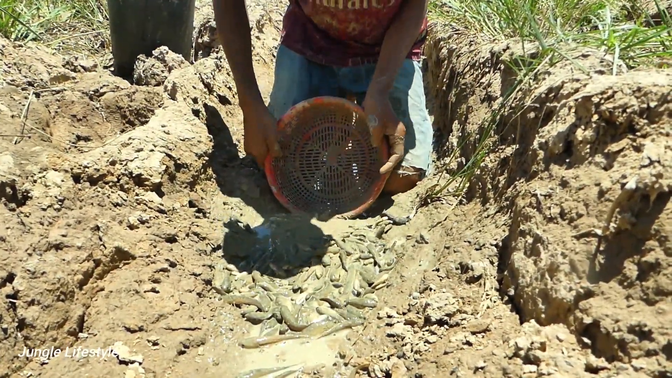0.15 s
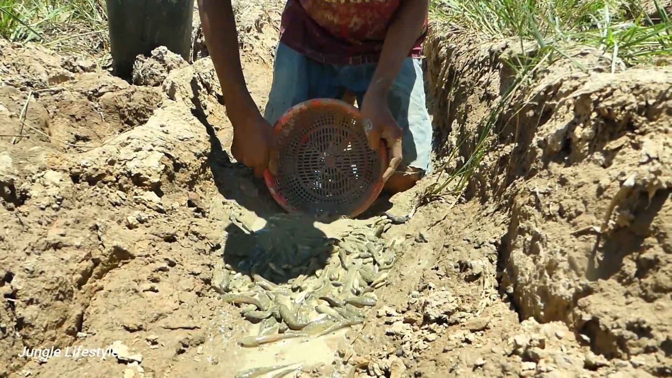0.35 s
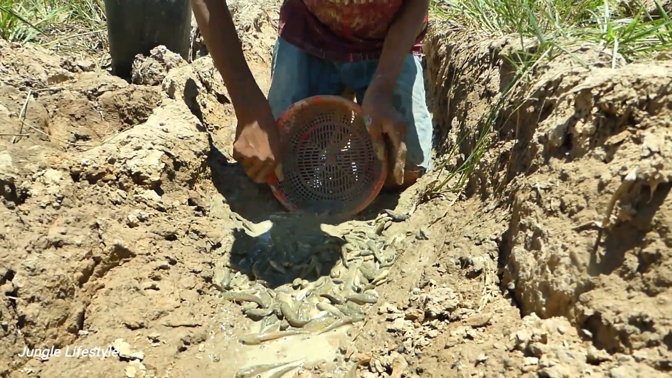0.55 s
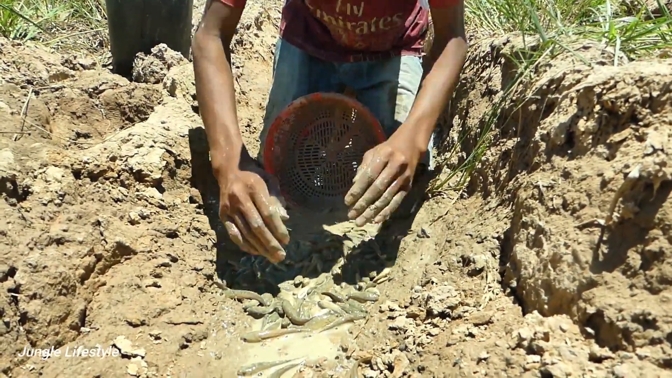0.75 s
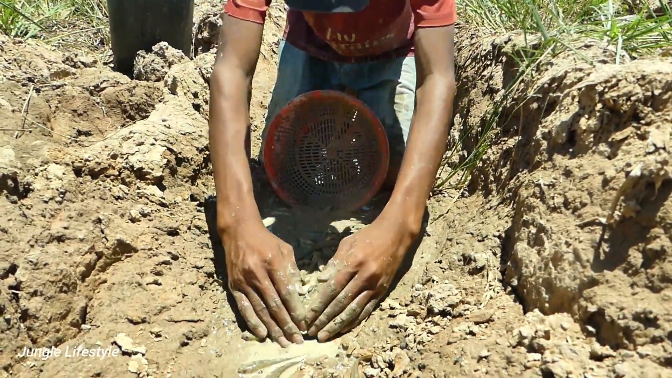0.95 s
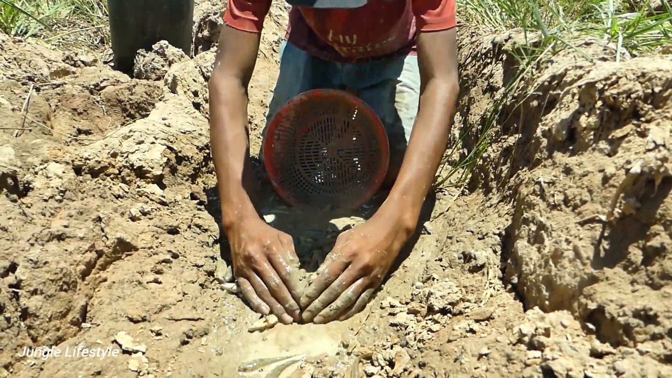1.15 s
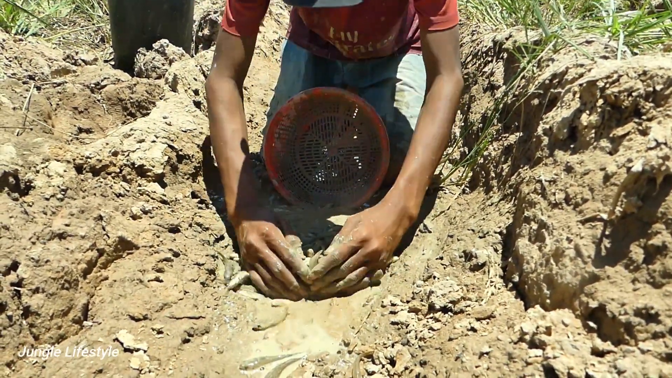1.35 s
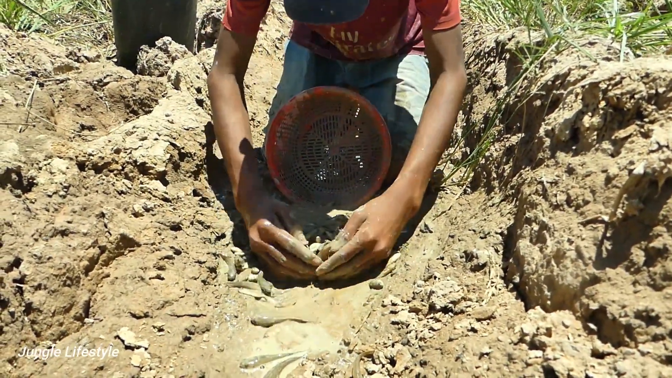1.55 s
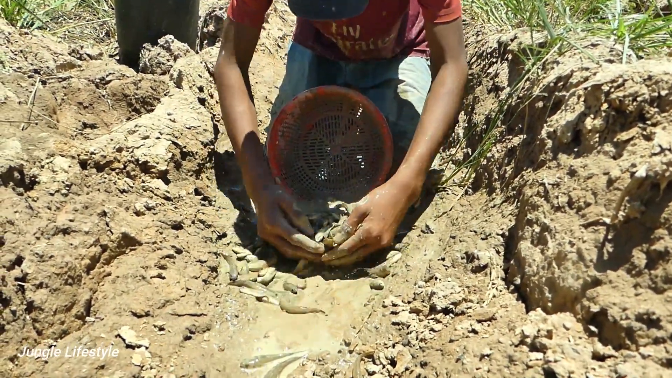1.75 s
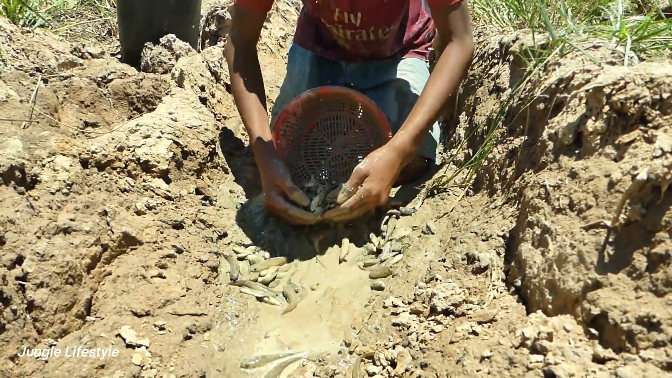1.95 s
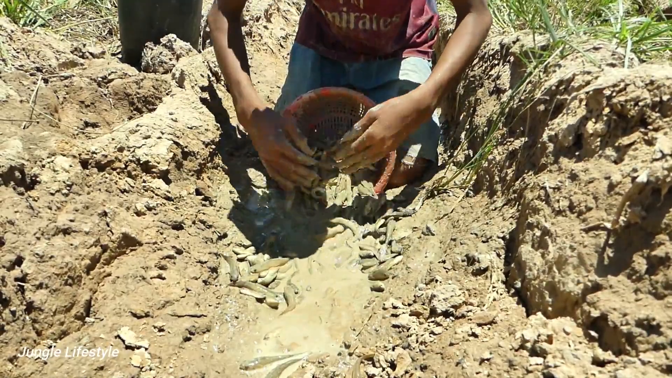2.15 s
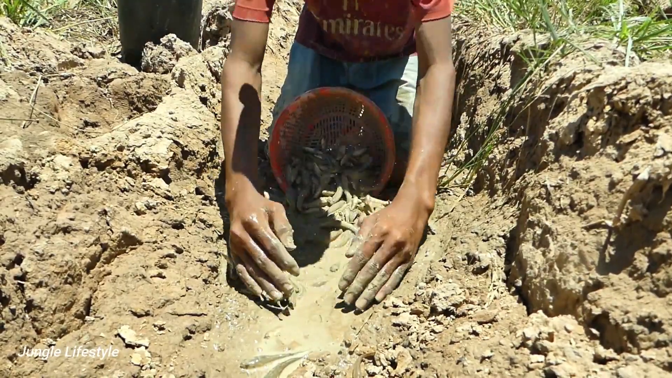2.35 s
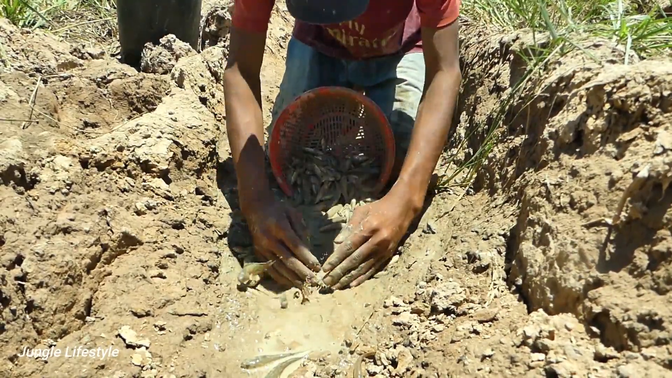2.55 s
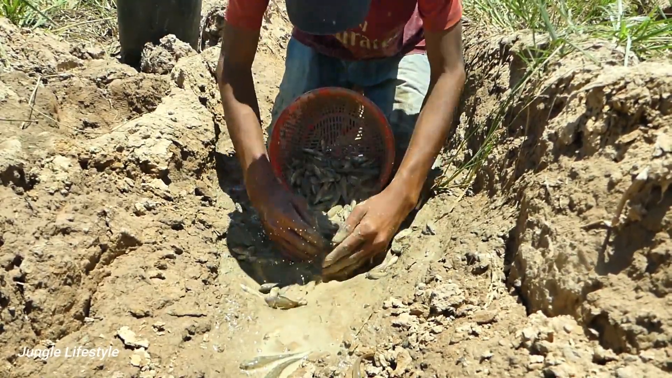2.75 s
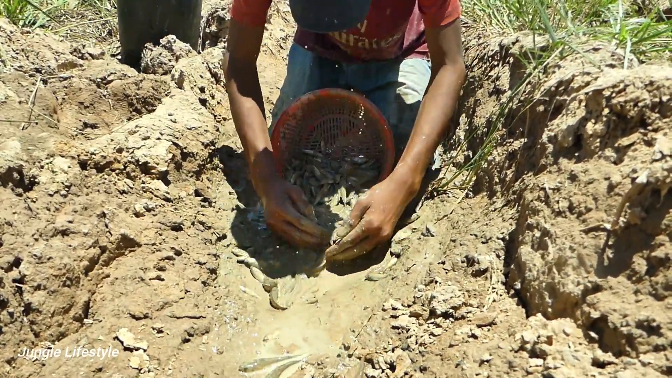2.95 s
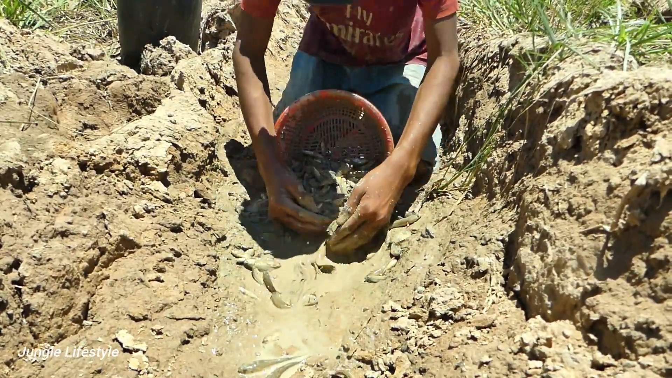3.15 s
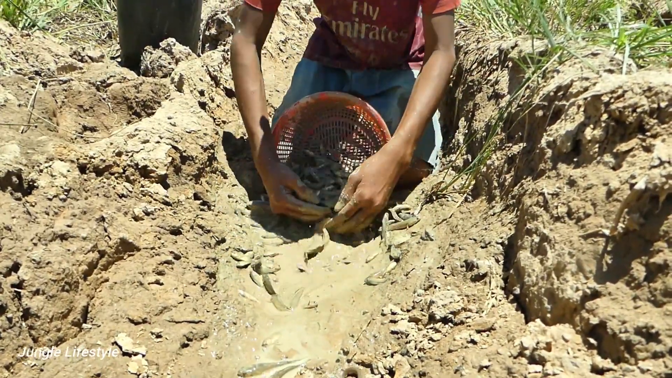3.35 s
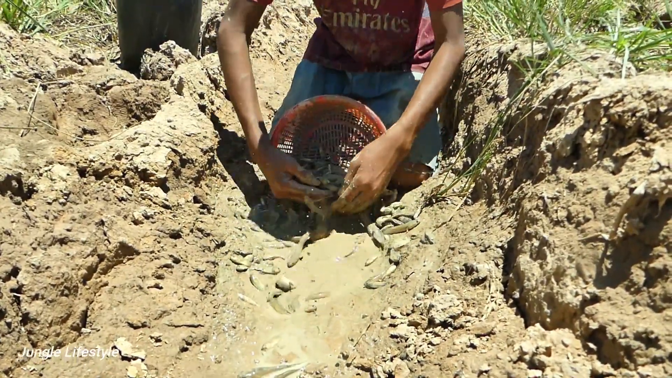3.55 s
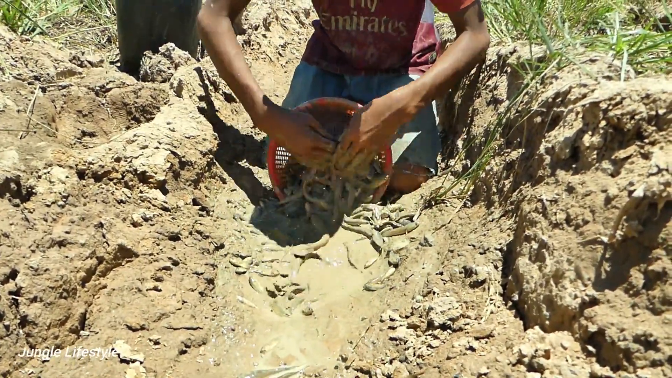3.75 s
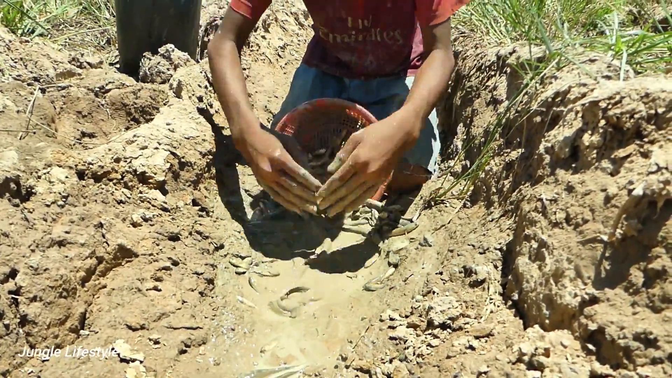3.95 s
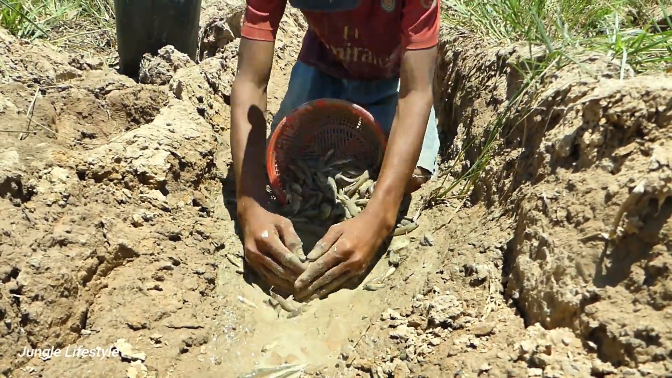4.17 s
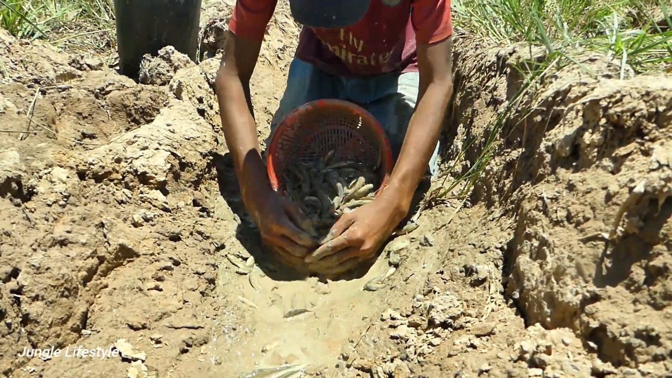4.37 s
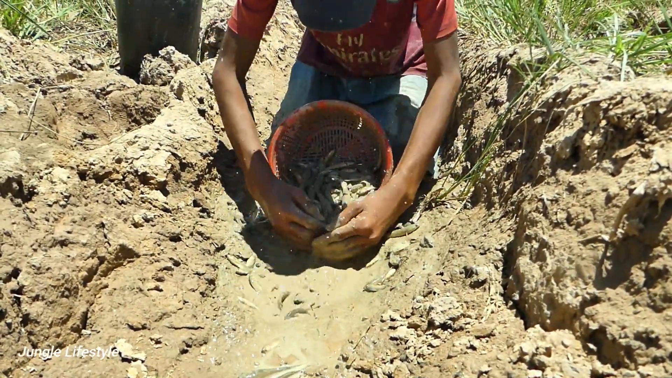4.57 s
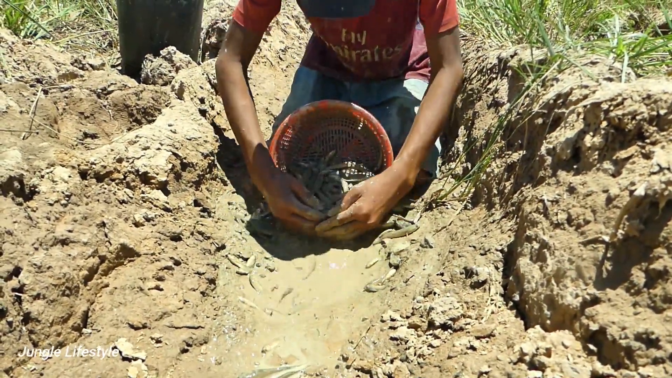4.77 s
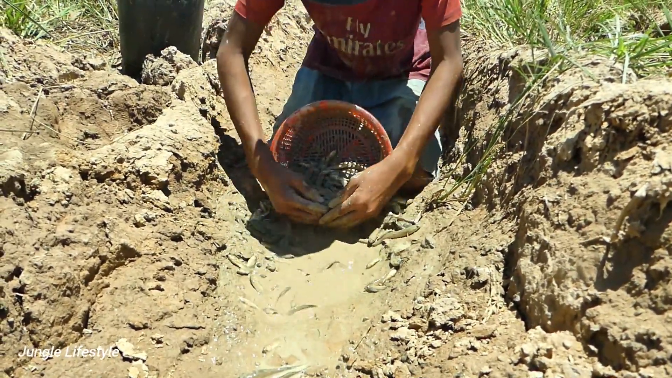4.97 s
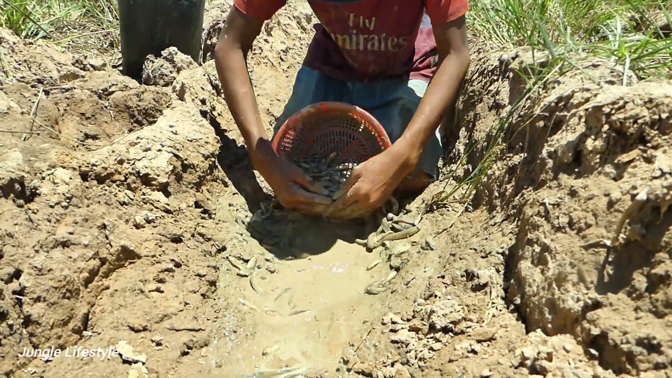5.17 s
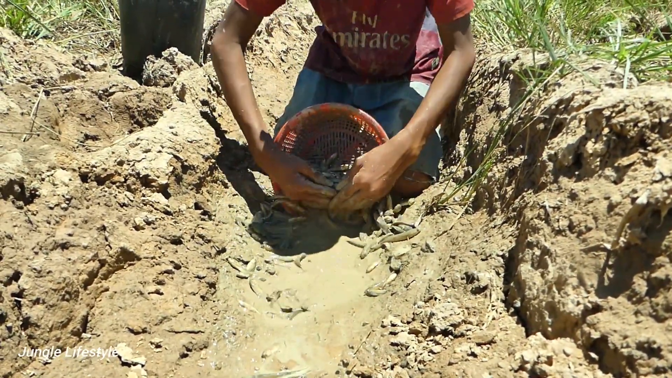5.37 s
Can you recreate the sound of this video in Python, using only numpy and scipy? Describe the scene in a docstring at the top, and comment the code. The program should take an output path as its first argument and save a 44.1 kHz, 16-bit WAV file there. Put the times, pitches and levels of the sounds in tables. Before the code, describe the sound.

A close, dry outdoor sound with a very faint airy hush. From 0 to 0.75 s a plastic sieve shifts over soil: a hollow mid-pitched scrape with fine grit, swelling from about 0.3 s and carrying a faint gliding note, with a barely audible thin whistle near 0.75 s. After a near-quiet gap, soft low thumps at 1.05-1.2 s mark hands pressing down. At about 1.4 s wet smacks and bright bubble pops begin over light crackling slurry. Around 2.1-2.9 s handfuls drop with low thuds, short spray and tiny snaps. From 3.4 s squelches thicken, with a sharp slap at 3.85 s and rumbling presses near 4 s. A strong crackling slosh with gurgles hits at 4.4 s. Deep, round pops and watery squeezing crowd 4.75-5.15 s, followed by the heaviest thud at 5.23 s. Short reflections from earth walls surround the wet sounds.

```python
"""Scooping wet mud into a sieve

Two hands scoop wet mud and small fish from a shallow puddle into a plastic sieve, outdoors.
The sieve scrapes on the soil as shaped noise around a hollow note. Air pockets pop as rising sines, wet films
smack and snap as noise bursts, and the slurry crackles and sloshes as clumps of tiny rings over filtered noise.
Low thuds and rumble land under it; slurry and rumble gain level as the work goes on. A faint hush lies behind.
"""
import sys
import numpy as np
from scipy import signal
from scipy.fft import rfft, irfft, next_fast_len
from scipy.io import wavfile
from scipy.ndimage import uniform_filter1d, map_coordinates

SR = 44100
rng = np.random.default_rng(int(sys.argv[2]) if len(sys.argv) > 2 else 0)


def transcribe(u):
    """Save the signal u as a 16-bit wav file named by the first command-line argument.

    u: samples, shape (n,) or (channels, n), limited to [-1, 1]; the rate is SR.
    q: integer samples, one column per channel.
    """
    v = np.clip(np.atleast_2d(u).T, -1, 1)
    q = np.round(v * 32767).astype(np.int16)
    wavfile.write(sys.argv[1], SR, q)


N = 238889

# outdoor background spectrum: (frequency [Hz], level [dB])
AIR_SPECTRUM = [(20, -37), (60, -40), (130, -20), (280, -13.5), (430, -11.5), (620, -16.5), (950, -17.5),
                (1400, -21), (2700, -26), (7000, -63), (10000, -31.5), (16000, -68)]
# left-right correlation of the background: (frequency [Hz], correlation [-1 to 1])
AIR_CORRELATION = [(60, -0.3), (300, 0.48), (1400, -0.39), (3100, 0.57), (7000, 1)]
# sieve dragged over the soil: (time [s], hollow level [dB], grit level [dB])
DRAG = [(0, -51, -56), (.15, -84, -60.5), (.28, -53, -51.5), (.4, -48.5, -49), (.5, -47, -58.5),
        (.6, -46, -46.5), (.7, -46.5, -59), (.76, -54, -54), (1.05, -86, -60.5), (1.32, -90, -50.5),
        (1.5, -100, -80)]
# hollow note as the sieve is pushed home: (time [s], pitch [Hz], level [dB])
SIEVE_NOTE = [(.25, 385, -64), (.37, 405, -50), (.55, 440, -47.5), (.69, 428, -44.5), (.76, 425, -72),
              (.9, 425, -120)]
# hollow scrape spectrum: (frequency [Hz], level [dB])
SIEVE_SPECTRUM = [(250, -14), (360, 0), (405, 1.5), (455, 2), (520, -1.5), (700, -13), (920, -7.5),
                  (1200, -27), (3000, -48)]
# fine grit and hiss spectrum: (frequency [Hz], level [dB])
GRIT_SPECTRUM = [(900, -5.5), (1600, -2), (2600, 0.5), (3600, 2.5), (5500, 0.5), (7500, -4), (9500, -2),
                 (14000, -7), (16000, -18)]
# low rumble of the ground: (frequency [Hz], level [dB])
GROUND_SPECTRUM = [(20, -35), (40, -42), (65, -0.5), (110, 5.5), (190, -2.5), (300, -14.5), (450, -11.5),
                   (900, -42)]
# mud giving way under a blow: (frequency [Hz], level [dB])
SQUASH_SPECTRUM = [(60, -29), (150, 7), (260, 1), (340, -3), (480, -43), (900, -23), (3000, -67)]
# hands leaning on the mud: (time [s], hold [s], level [dB])
PRESSES = [(1.057, 0.17, -44), (2.068, 0.23, -36), (2.438, 0.22, -38), (2.717, 0.27, -41),
           (3.178, 0.16, -39), (3.474, 0.056, -34.5), (3.91, 0.4, -33.5), (4.436, 0.096, -33.5),
           (4.854, 0.065, -33), (5.06, 0.13, -36), (5.223, 0.14, -30.5)]
# heaviest blows of hands and mud on the ground: (time [s], relative level [dB], centre pitch [Hz])
THUDS = [(0.146, -31.5, 130), (1.06, -27, 151), (1.134, -24.5, 107), (1.19, -22, 123), (2.101, -20.5, 165),
         (2.224, -15, 126), (2.455, -25, 120), (2.729, -25.5, 137), (2.785, -17, 133), (2.922, -22, 109),
         (3.506, -19, 181), (3.935, -17.5, 189), (3.952, -21, 263), (4.014, -18, 114), (4.121, -21, 119),
         (4.147, -20.5, 153), (4.211, -16, 126), (4.264, -19.5, 181), (4.444, -18, 158),
         (4.462, -14.5, 206), (4.523, -15.5, 134), (4.841, -21.5, 138), (4.934, -15.5, 186),
         (5.232, -9.5, 121), (5.25, -14, 175), (5.301, -17.5, 217.6)]
# muddy water spraying and draining through the mesh: (time [s], hold [s], level [dB])
SPRAYS = [(2.094, 0.25, -51.5), (2.454, 0.39, -57), (3.407, 0.3, -55), (3.774, 0.15, -45.5),
          (4.41, 0.13, -46.5)]
# spray spectrum: (frequency [Hz], level [dB])
SPRAY_SPECTRUM = [(2000, -22), (5000, 4), (7500, 1), (10000, 2.5), (13500, -4), (16000, -15)]
# span with the hands in the puddle: (start [s], hold [s])
WORK = (1.38, 3.77)
# fingers squeezing through the slurry: (time [s], hold [s], crackle level [dB], slosh level [dB])
SQUEEZES = [(1.434, 0.12, -45, -46.5), (1.805, 0.33, -46.5, -50.5), (2.116, 0.12, -43.5, -44),
            (2.485, 0.32, -46, -48.5), (2.727, 0.037, -45, -48), (2.944, 0.036, -41.5, -47),
            (3.224, 0.29, -45.5, -47), (3.434, 0.29, -43, -45), (3.757, 0.196, -43.5, -44),
            (4.085, .14, -46.5, -50.5), (4.414, 0.088, -35.5, -38.5), (4.769, 0.051, -42.5, -38.5),
            (4.962, 0.19, -44.5, -36.5)]
# stirred mud spectrum: (frequency [Hz], level [dB])
SLURRY_SPECTRUM = [(700, 6.5), (1500, -6.5), (2300, 6.5), (3500, 6), (4800, 2), (6500, 4), (7500, -1.5),
                   (10000, -1), (14000, -5), (16000, -14)]
# sloshing water spectrum: (frequency [Hz], level [dB])
PUDDLE_SPECTRUM = [(300, 3.5), (550, 0), (850, 4.5), (1200, -4), (1600, -1), (2600, -16), (5000, -51)]
# mud gurgling through the hollow of the palms: (time [s], length [s], level [dB], cavity pitch [Hz])
SQUELCHES = [(2.151, 0.037, -35.5, 830), (2.73, .025, -41.5, 1700), (3.289, 0.038, -45.5, 2310),
             (3.459, 0.036, -38.5, 1800), (3.611, 0.021, -43.5, 1690), (3.666, 0.016, -38, 1750),
             (3.881, 0.008, -35.5, 3500), (3.919, 0.024, -45.5, 826), (4.351, 0.014, -39, 1470),
             (4.392, 0.0098, -34.5, 860), (4.428, .045, -35, 2330), (4.47, 0.023, -34, 1030),
             (4.983, 0.026, -29, 863), (4.989, 0.024, -30.5, 1980), (5.089, 0.041, -32.5, 940)]
# taut little films that snap: (time [s], relative level [dB], centre frequency [Hz])
TICKS = [(1.602, -34, 5240), (1.667, -30, 9000), (1.757, -27, 5000), (2.201, -24, 4500),
         (2.291, -21.5, 9900), (2.765, -21.5, 11500), (2.852, -26, 5030), (3.072, -27, 5050),
         (3.106, -31.5, 8100), (3.237, -23, 9900), (3.294, -25, 4220), (3.344, -34, 9000),
         (3.367, -27, 6000), (3.577, -24, 7000), (3.63, -29, 4770), (3.702, -22, 6550), (4.021, -28, 4570),
         (4.035, -23, 9100), (4.111, -20.5, 8250), (4.585, -24.5, 6500)]
# loudest wet films that tear or slap: (time [s], relative level [dB], centre frequency [Hz], decay [s])
SMACKS = [(1.325, -33.5, 4200, 0.0037), (1.342, -28.5, 3570, 0.0062), (1.363, -34.5, 3900, 0.0059),
          (1.388, -31.5, 3000, 0.0052), (1.421, -31, 4200, 0.004), (1.442, -26, 3850, 0.0037),
          (1.443, -23, 4250, 0.018), (1.469, -21.5, 4700, 0.0098), (1.968, -32.5, 3130, 0.025),
          (2.195, -32.5, 3760, 0.019), (2.467, -16, 9500, 0.0042), (2.48, -22.5, 4380, 0.004),
          (2.496, -24.5, 7900, 0.0047), (2.518, -24, 4970, 0.0072), (2.647, -23.5, 3800, 0.011),
          (2.779, -22.5, 7600, 0.0041), (3.399, -23.5, 9300, 0.011), (3.473, -19, 4850, 0.005),
          (3.532, -37, 2000, 0.0034), (3.613, -21, 4220, 0.0077), (3.783, -30.5, 6000, .012),
          (3.796, -25, 5700, 0.0085), (3.8443, -8.5, 6700, 0.0027), (3.913, -25.5, 4200, 0.0032),
          (3.930, -15.5, 6600, 0.0041), (4.259, -19.5, 4600, 0.0027), (4.376, -23, 6000, 0.0055),
          (4.394, -29, 1850, 0.016), (4.401, -16, 4700, 0.009), (4.494, -21.5, 3300, 0.0045),
          (4.806, -25, 2380, 0.0051), (5.0484, -17.5, 4460, 0.003), (5.078, -22.5, 3720, 0.0028),
          (5.108, -18, 1560, 0.0023), (5.383, -39.5, 6600, 0.02)]
# largest air pockets that open and ring: (time [s], relative level [dB], starting pitch [Hz])
BUBBLES = [(0.14, -37, 2450), (0.243, -34, 3660), (1.178, -37, 860), (1.247, -31.5, 750),
           (1.452, -17.5, 3850), (1.457, -12.5, 4800), (1.553, -30, 3840), (1.784, -24.5, 4770),
           (1.858, -23, 2000), (1.95, -22, 1680), (1.983, -20.5, 2890), (2.228, -25.5, 4760),
           (2.243, -24.5, 5680), (2.560, -24, 3300), (2.811, -28.5, 2220), (3.007, -29.5, 900),
           (3.267, -29.5, 755), (3.312, -28.5, 2300), (3.449, -27, 920), (3.532, -12, 1500),
           (3.574, -18.5, 1480), (3.832, -17, 2900), (4.379, -17.5, 2600), (4.454, -16.5, 1490),
           (4.498, -18, 1500), (4.52, -15.5, 2370), (4.748, -11.5, 3600), (4.783, -18.5, 2430),
           (4.864, -20.5, 3430), (4.931, -16, 795), (4.977, -24.5, 1240), (5.004, -18, 780),
           (5.025, -11.5, 2110), (5.051, -18.5, 2070), (5.081, -16, 870), (5.1078, -11, 825),
           (5.153, -22.5, 970)]

TOP_HZ = 15900  # band limit
TRICKLE_DB, SEEP_DB = -51, -53  # crackle and slosh of draining mud, as the work begins
REST_DB = -53  # rumble between presses, as the work begins
WETTER_DB_PER_S, HEAVIER_DB_PER_S = 1.02, 3  # growth of draining and of resting rumble
# ring time at this pitch; larger pockets ring slightly longer
POP_LIFE_S, POP_LIFE_HZ, POP_LIFE_EXPONENT = 0.0032, 2000, 0.023


def amp(db):
    """Decibels to gain."""
    return 10 ** (np.asarray(db) / 20)


def unit(x):
    """Scale to rms 1."""
    return x / np.sqrt(np.mean(x ** 2) + 1e-20)


def along(points, hz):
    """(Hz, value) points read on a log axis."""
    f, v = np.transpose(points)
    return np.interp(np.log(hz + 1), np.log(f + 1), v)


def curves(rows):
    """One value per sample for each column after the time."""
    times_s, *columns = np.transpose(rows)
    return [np.interp(np.arange(N) / SR, times_s, column) for column in columns]


def wobble(rate_hz):
    """A smooth random curve, rate_hz knots a second."""
    knots = rng.standard_normal(int(N * rate_hz / SR) + 4)
    return map_coordinates(knots, [np.arange(N) * rate_hz / SR])


def noise_pair(size=N):
    """Two independent white noises."""
    return rng.standard_normal((2, size))


def filtered(x, response):
    """x times a response of frequency."""
    n = x.shape[-1]
    m = next_fast_len(n + 4096)
    return irfft(rfft(x, m) * response(np.fft.rfftfreq(m, 1 / SR)), m)[..., :n]


def coloured(x, spectrum):
    """x through (Hz, dB) points, at rms 1."""
    return unit(filtered(x, lambda hz: amp(along(spectrum, hz))))


def octave_bell(f, hz, octaves):
    """Gaussian response around hz on an octave axis."""
    return np.exp(-.5 * (np.log2((f + 1) / hz) / octaves) ** 2)


def stereo(pair, side_db):
    """Left and right from a shared signal and a scaled difference."""
    return pair[0] + amp(side_db) * np.array([pair[1], -pair[1]])


def add(track, s, sound):
    """Mix a sound into a track at a time."""
    part = track[..., max(round(s * SR), 0):][..., :sound.shape[-1]]
    part += sound[..., :part.shape[-1]]


def stroke(s, length_s, attack_s, release_s):
    """Gain of one movement: it swells, holds for its length and dies away."""
    t = np.arange(N) / SR - s
    return np.exp(np.minimum(t, 0) / attack_s - np.maximum(t - length_s, 0) / release_s)


def busier(db_per_s):
    """Gain that grows from the moment the work begins."""
    return amp(db_per_s * np.maximum(np.arange(N) / SR - WORK[0], 0))


def resonance(hz, width_hz):
    """Two narrow noises of rms 1 that follow a pitch curve."""
    a, b = filtered(rng.standard_normal((2, 2, len(hz))), lambda f: 1 / (1 + (f / width_hz) ** 3))
    phase = 2 * np.pi * np.cumsum(hz) / SR
    return unit(a * np.cos(phase) + b * np.sin(phase))


def grains(rate_hz, pitch_hz, spread, life_s, size_db, count=3, size=N):
    """Tiny bursts, rms 1 overall: each collapses a few bubbles of unrelated pitch within milliseconds."""
    bursts = np.repeat(rng.random((int(rate_hz * size / SR), 2)), count, axis=0)
    u = rng.random((len(bursts), 4))
    hz = np.minimum(pitch_hz * np.exp(spread * (2 * u[:, :1] - 1)), TOP_HZ)
    # one size per burst, one share per bubble
    strength = amp(size_db * np.minimum(-np.log(bursts[:, 1:]), np.pi)) * u[:, 1:2]
    strength = strength * (hz / pitch_hz) ** .4
    k = np.arange(SR // 120)
    age = k / SR / (life_s * np.exp(u[:, 2:3] - .5))
    ring = strength * np.sin(2 * np.pi * hz * k / SR) * np.sqrt(age) * np.exp(-age)
    start = (bursts[:, :1] * size + u[:, 3:] * 4 * life_s * SR).astype(int)
    return unit(np.bincount((start + k).ravel(), ring.ravel(), size)[:size])


def air(level_db=-50, hiss_db=-59):
    """A faint, wide outdoor hush with a little hiss: noise with a set left-right correlation by frequency."""
    def mid_side_gains(hz):
        angle = np.arccos(np.clip(along(AIR_CORRELATION, hz), -1, 1)) / 2
        return np.array([np.cos(angle), np.sin(angle)])

    mid, side = filtered(noise_pair(), mid_side_gains)
    hush = coloured(np.array([mid + side, mid - side]), AIR_SPECTRUM)
    hiss = stereo(coloured(noise_pair(), GRIT_SPECTRUM), side_db=-1.5)
    return amp(level_db) * hush + amp(hiss_db) * hiss


def whistle(s=.73, length_s=.17, hz=2729, level_db=-59.5):
    """A thin, faint whistle sounds briefly: one narrow resonance."""
    gain = amp(level_db) * stroke(s, length_s, attack_s=.02, release_s=.02)
    return gain * resonance(np.full(N, hz), width_hz=12)


def sieve(octave_db=-11):
    """The plastic sieve shifts over the soil: a hollow scrape, a faint gliding note and fine grit on top."""
    hollow_db, grit_db = curves(DRAG)
    note_hz, note_db = curves(SIEVE_NOTE)
    hollow = amp(hollow_db) * stereo(coloured(noise_pair(), SIEVE_SPECTRUM), side_db=-2.0)
    partials = resonance(note_hz, width_hz=9.0) + amp(octave_db) * resonance(2 * note_hz, width_hz=32)
    note = amp(note_db) * stereo(partials, side_db=-25)
    grit_gain = amp(grit_db + 2.84 * wobble(118.0))
    grit = grit_gain * stereo(coloured(noise_pair(), GRIT_SPECTRUM), side_db=-10)
    return hollow + note + grit


def kneading(attack_s=0.039, release_s=0.03, squash_db=-11):
    """Each press of the hands raises a lumpy low rumble and squashes mud aside; a little rumble stays between."""
    press = sum(amp(db) * stroke(s, length_s, attack_s, release_s) for s, length_s, db in PRESSES)
    rest = amp(REST_DB) * busier(HEAVIER_DB_PER_S)
    lumps = unit(amp(3.5 * wobble(45)))
    rumble = stereo(coloured(noise_pair(), GROUND_SPECTRUM), side_db=-9)
    squash = stereo(coloured(noise_pair(), SQUASH_SPECTRUM), side_db=-8.0)
    return lumps * (np.maximum(press, rest) * rumble + amp(squash_db) * press * squash)


def thuds(swell_s=0.0053, sag=0.06, push_db=-2, squash_db=-13, squash_s=0.029, side_db=0):
    """Soft contacts push the damp ground as a short, sagging low sine while the mud squashes aside."""
    out, t = np.zeros((2, N)), np.arange(SR // 8) / SR
    age = t / swell_s
    swell = age ** 2 * np.exp(2 * (1 - age))
    give = (1 - np.exp(-age)) * np.exp(-(t / squash_s) ** 2)
    for s, db, hz in THUDS:
        sagging_hz = hz * (1 + sag * (np.exp(-age) * 2 - 1))
        push = swell * np.sin(2 * np.pi * np.cumsum(sagging_hz) / SR)
        squash = stereo(coloured(noise_pair(len(t)), SQUASH_SPECTRUM), side_db) * give
        squash *= hz / 150  # quicker blows squash more
        add(out, s, amp(db + push_db) * push + amp(db + squash_db) * squash)
    return out


def spray(attack_s=0.1, release_s=0.016, spatter_db=3):
    """Countless tiny droplets make a bright, spattering hiss: dense grains and noise under a fast wobble."""
    flow = sum(amp(db) * stroke(s, length_s, attack_s, release_s) for s, length_s, db in SPRAYS)
    drops = grains(rate_hz=2000, pitch_hz=7500, spread=.7, life_s=.0004, size_db=3.5)
    hiss = coloured(np.array([drops, rng.standard_normal(N)]), SPRAY_SPECTRUM)
    spatter = unit(amp(spatter_db * wobble(300)))
    return flow * spatter * stereo(hiss, side_db=-10)


def stirring(attack_s=0.03, release_s=0.03, enter_s=0.05, settle_s=0.025):
    """Gain of the crackle and of the slosh: squeezes over a growing drainage."""
    draining = stroke(*WORK, enter_s, settle_s) * busier(WETTER_DB_PER_S)
    crackle, slosh = amp(TRICKLE_DB) * draining, amp(SEEP_DB) * draining
    for s, length_s, crackle_db, slosh_db in SQUEEZES:
        squeeze = stroke(s, length_s, attack_s, release_s)
        crackle = np.maximum(crackle, amp(crackle_db) * squeeze)
        slosh = np.maximum(slosh, amp(slosh_db) * squeeze)
    return crackle, slosh


def slurry(crackle, slosh):
    """Stirred mud crackles in fine bubbles and ringing beads over rough fizz; water sloshes with larger bubbles."""
    clumps = amp(2 * wobble(70))
    fine = grains(rate_hz=750, pitch_hz=4400, spread=1.15, life_s=.00046, size_db=5.9, count=3)
    beads = grains(rate_hz=230, pitch_hz=3200, spread=.65, life_s=.001, size_db=5, count=2)
    coarse = grains(rate_hz=330, pitch_hz=1400, spread=.7, life_s=.00095, size_db=5, count=2)
    rough = unit(amp(3.5 * wobble(300)))
    fizz = rough * stereo(coloured(noise_pair(), SLURRY_SPECTRUM), side_db=-3.5)
    wash = stereo(coloured(noise_pair(), PUDDLE_SPECTRUM), side_db=6.5)
    mud = amp(-1) * coloured(fine, SLURRY_SPECTRUM) + amp(-4) * beads + amp(-4) * fizz
    water = amp(-2) * coloured(coarse, PUDDLE_SPECTRUM) + amp(-9) * wash
    return clumps * (crackle * mud + slosh * water)


def squelches(spread=0.31, cycles=1.255, release_s=0.0021):
    """Mud pushed through the palms gurgles: a quick, uneven run of small bubbles around the hollow's pitch."""
    out = np.zeros(N)
    for s, length_s, db, hz in SQUELCHES:
        size = int((length_s + 2 * release_s) * SR)
        run = grains(rate_hz=600, pitch_hz=hz, spread=spread, life_s=cycles / hz,
                     size_db=3, count=2, size=SR // 10)[:size]
        fade = np.minimum((size - np.arange(size)) / (2 * release_s * SR), 1)
        add(out, s, amp(db) * unit(run * fade))
    return out


def ticks(decay_s=0.0023, attack_s=0.00015, octaves=0.27, trim_db=-4, skirt_db=-15, side_db=-13):
    """A taut film of mud breaks at once: one crisp burst of band noise over a flat skirt."""
    out, t = np.zeros((2, N)), np.arange(SR // 50) / SR
    shape = np.exp(-t / decay_s) * (1 - np.exp(-t / attack_s))
    shape_rms = np.sqrt(np.mean(shape ** 2))
    for s, db, hz in TICKS:
        snap = filtered(noise_pair(len(t)), lambda f: octave_bell(f, hz, octaves) + amp(skirt_db))
        add(out, s, amp(db + trim_db) * stereo(unit(snap * shape), side_db) * shape_rms)
    return out


def smacks(octaves=0.84, snap_db=0.0, cavity_db=3.0, trim_db=-1, side_db=-14):
    """A tearing film is a short noise burst, coloured by the small cavities that open behind it."""
    out, t = np.zeros((2, N)), np.arange(SR // 15) / SR
    cavity_hz = np.geomspace(500, TOP_HZ, 24)
    for s, db, hz, decay_s in SMACKS:
        # at snap_db = 0 the noise stays even; higher values break it into snaps
        unevenness = unit(uniform_filter1d(rng.standard_normal(len(t)), 30))
        snaps = noise_pair(len(t)) * amp(snap_db * unevenness)
        burst = filtered(snaps, lambda f: octave_bell(f, hz, octaves) / np.sqrt(1 + f / hz) + 0.21 * (f < hz))
        cavities = np.transpose([cavity_hz, cavity_db * rng.standard_normal(len(cavity_hz))])
        burst = coloured(burst, cavities)
        shape = np.exp(-(t / decay_s) ** 1.52) * (1 - np.exp(-t / 0.0015))
        shape_rms = np.sqrt(np.mean(shape ** 2))
        add(out, s, amp(db + trim_db) * stereo(unit(burst * shape), side_db) * shape_rms)
    return out


def bubbles(rise=0.054, tick_db=-13, tick_s=0.004, overtone=2.6, overtone_db=-19):
    """Each pocket opens with a tick, rings upward as its mouth widens, and is choked by the mud."""
    out, t = np.zeros(N), np.arange(SR // 25) / SR
    for s, db, hz in BUBBLES:
        age = t / (POP_LIFE_S * (POP_LIFE_HZ / hz) ** POP_LIFE_EXPONENT)
        phase = 2 * np.pi * np.cumsum(hz * (1 + rise * np.minimum(age, 2))) / SR
        # only low pockets carry the overtone
        upper = amp(overtone_db) * np.sin(overtone * phase) * (overtone * hz < TOP_HZ / 2)
        ring = (np.sin(phase) + upper) * np.exp(-age ** 1.4) * (1 - np.exp(-t / 0.00026))
        tick = unit(filtered(rng.standard_normal(len(t)), lambda f: f / hz / (1 + (f / (1.37 * hz)) ** 3)))
        add(out, s, amp(db) * (ring + amp(tick_db) * tick * np.exp(-t / tick_s)))
    return out


def banks(x, t60_s=0.057):
    """The earth walls of the pit scatter a very short echo, different at each ear: decaying noise tails."""
    t = np.arange(SR // 8) / SR
    tail = noise_pair(len(t)) * amp(-60 * t / t60_s) * (1 - np.exp(-t / 0.0021))
    return signal.fftconvolve(x[None], tail / np.linalg.norm(tail[0]), axes=1)[:, :N]


def scene():
    """Wet sounds and their echo in the pit, over the thuds, the sieve and the open air."""
    background = air() + whistle()
    ground = sieve() + kneading() + thuds()
    crackle, slosh = stirring()
    wet = spray() + slurry(crackle, slosh) + squelches() + ticks() + smacks() + bubbles()
    return background + ground + wet + amp(-14.0) * banks(wet.mean(0))


def record(dry, low_hz=50):
    """The microphone loses the deepest bass and keeps nothing above its band limit."""
    return filtered(dry, lambda hz: (hz < TOP_HZ) * hz ** 2 / np.sqrt(hz ** 4 + low_hz ** 4))


dry = scene()
out = record(dry)
transcribe(out)
```